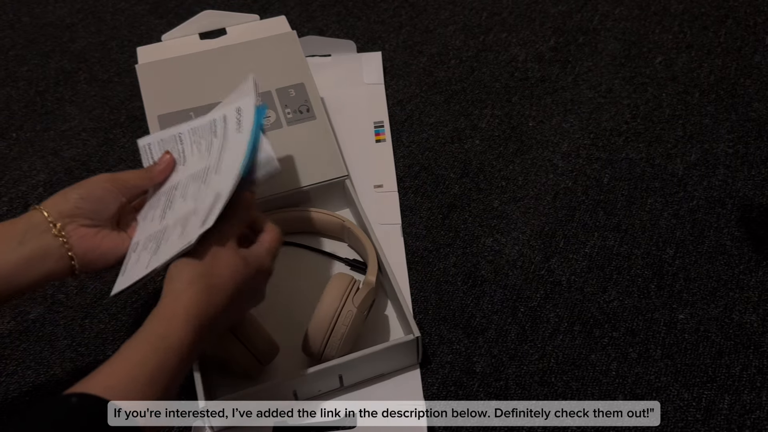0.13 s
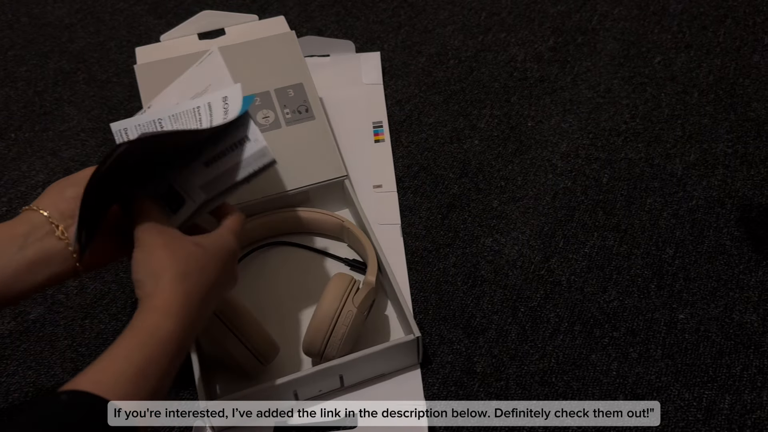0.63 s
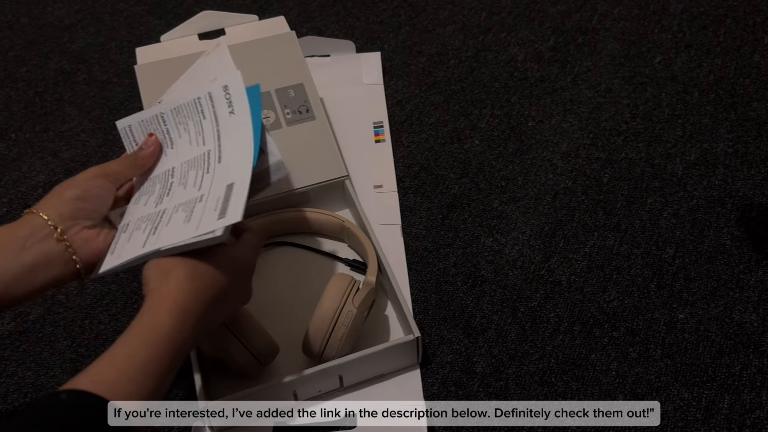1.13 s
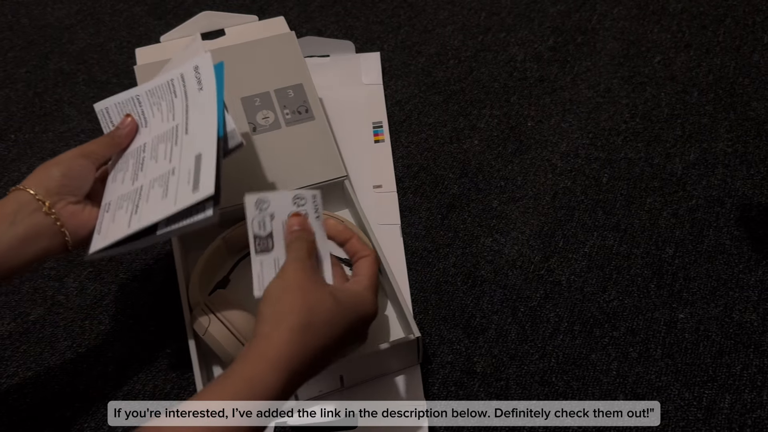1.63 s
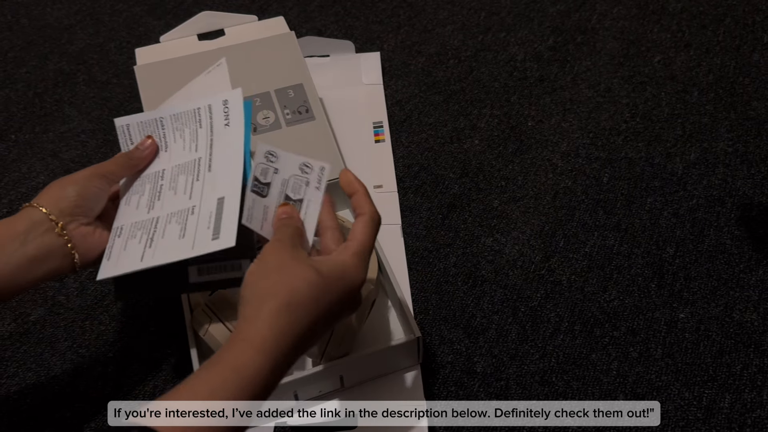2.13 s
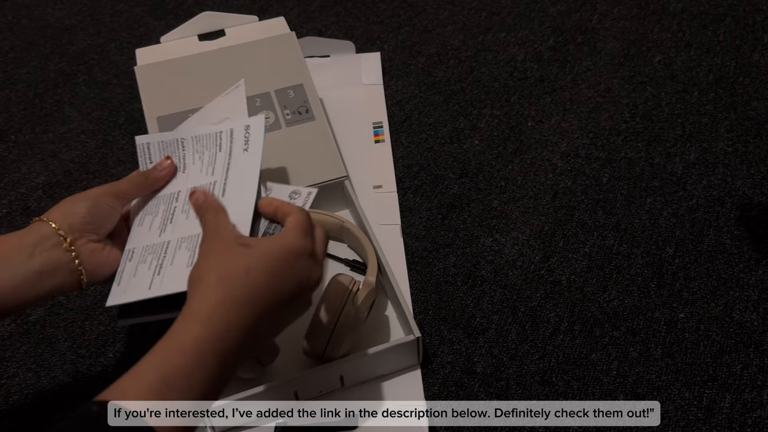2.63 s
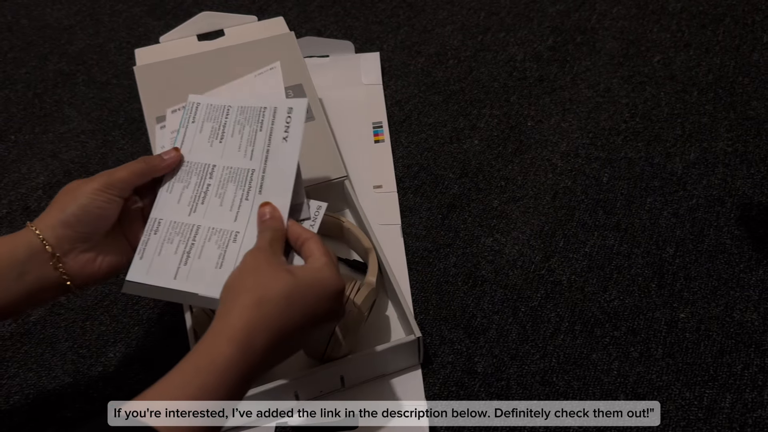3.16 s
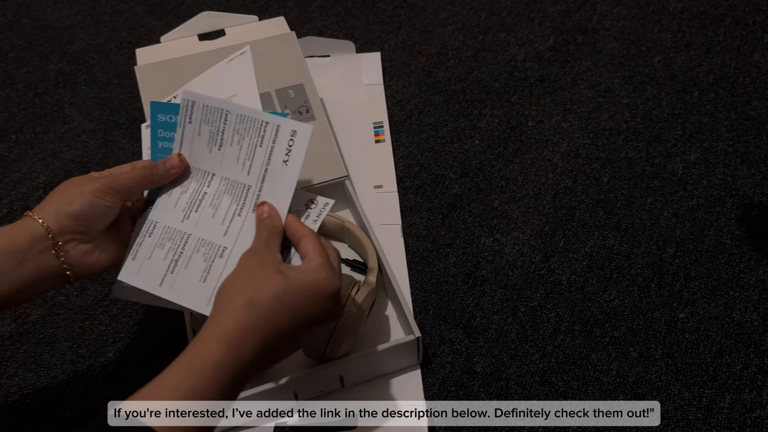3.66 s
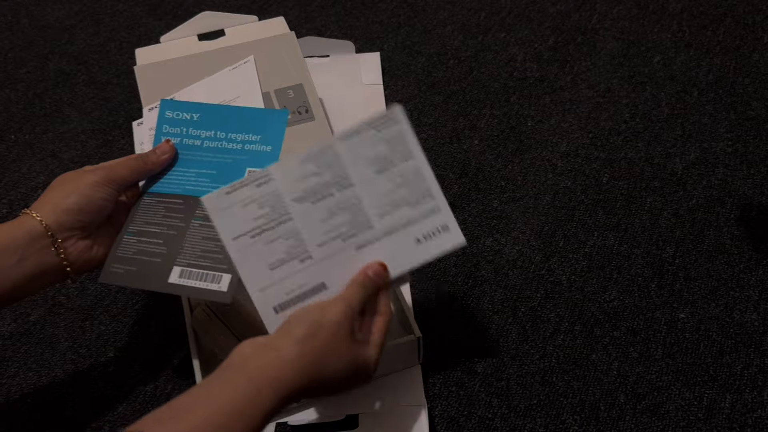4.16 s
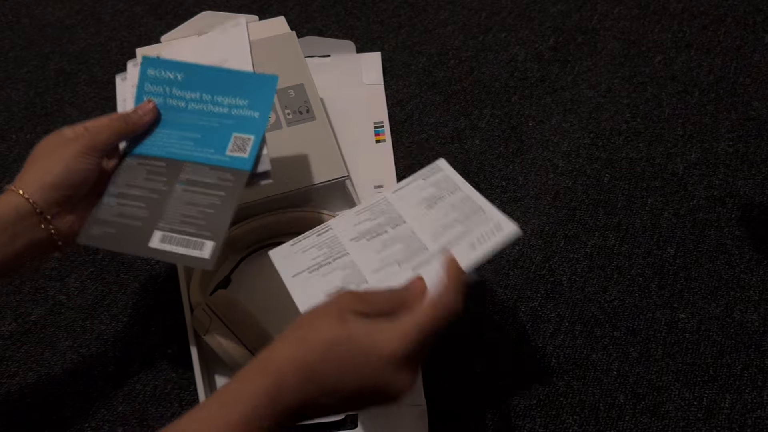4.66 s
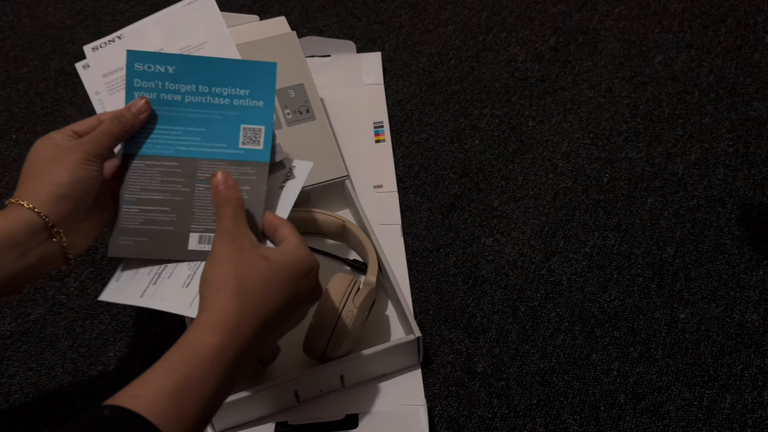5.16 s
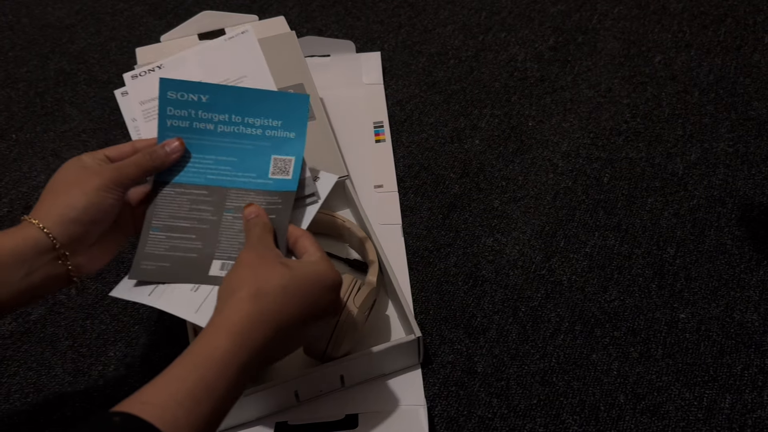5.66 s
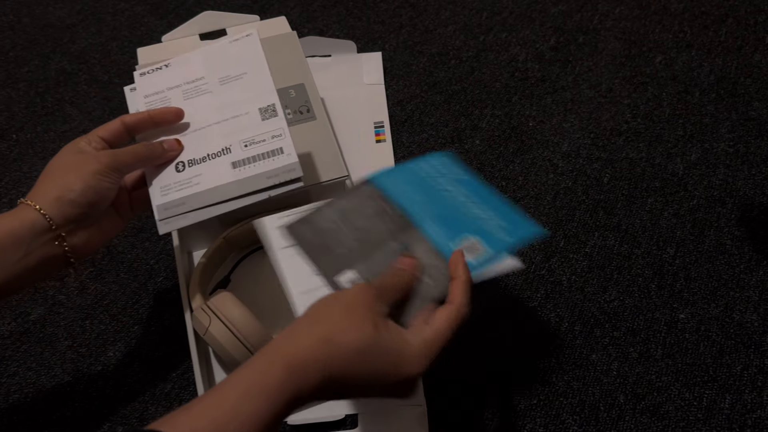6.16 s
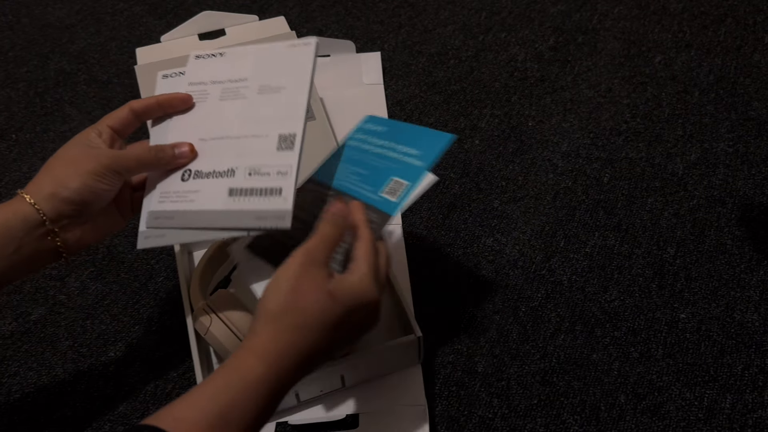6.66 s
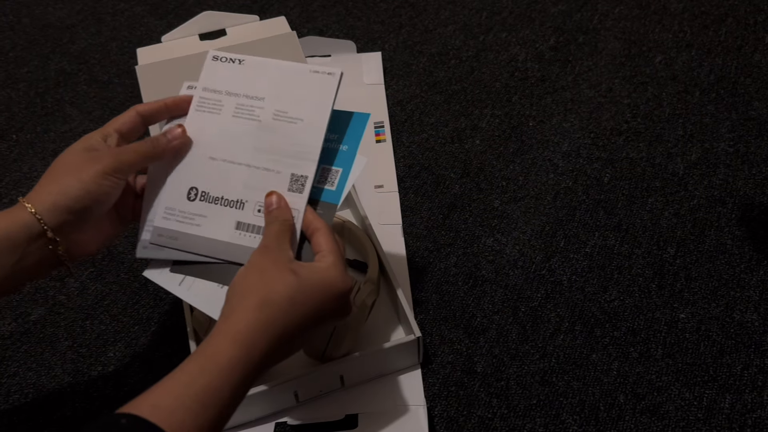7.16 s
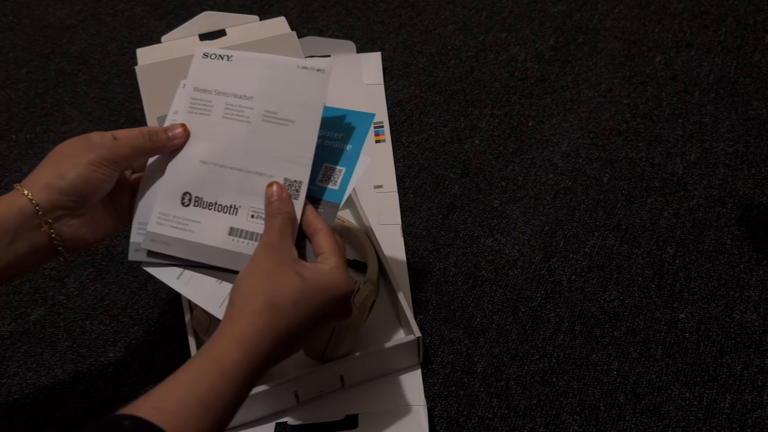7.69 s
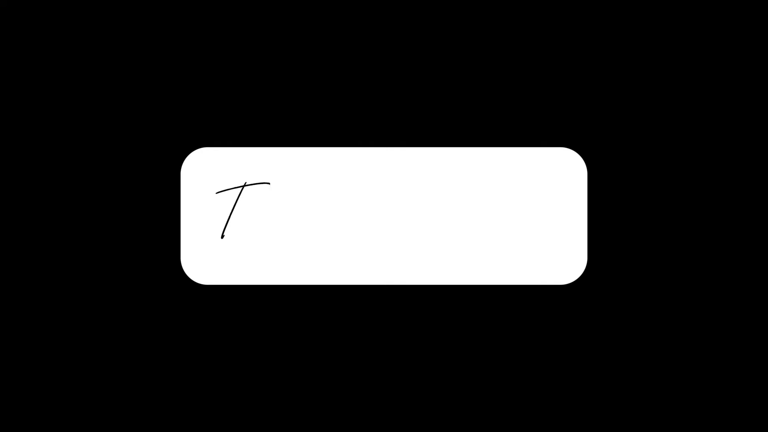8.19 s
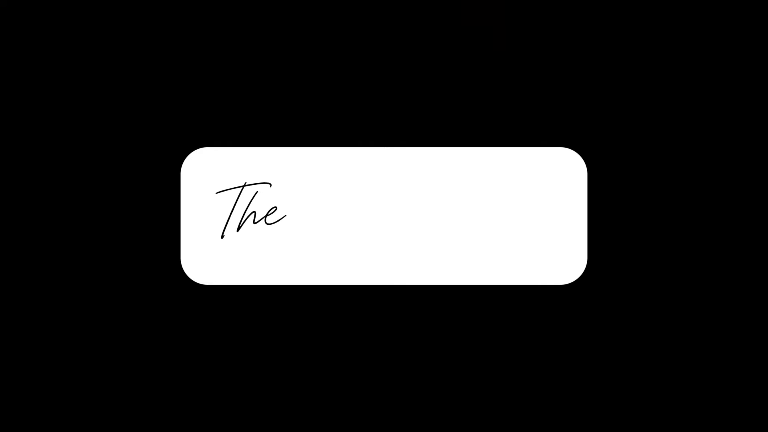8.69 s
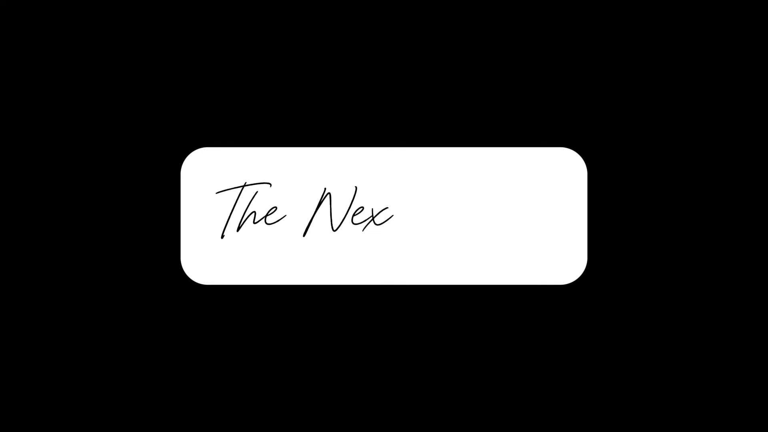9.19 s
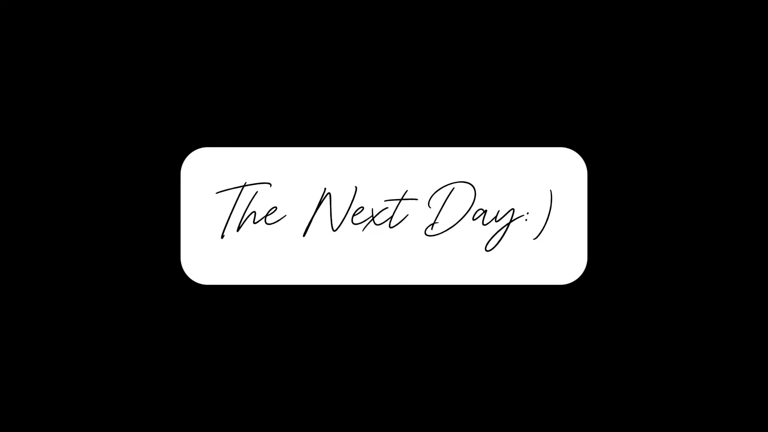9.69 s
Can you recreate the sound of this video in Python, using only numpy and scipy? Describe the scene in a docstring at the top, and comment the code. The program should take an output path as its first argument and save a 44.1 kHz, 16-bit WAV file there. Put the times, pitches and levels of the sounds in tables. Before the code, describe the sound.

Soft papery rustles, scrapes and small taps over a low appliance hum, abruptly replaced by close clacking plastic keys with low desk thumps.

```python
"""A quiet room with a humming appliance: hands leaf through paper leaflets over a cardboard box.
Skin and paper slide as shaped noise, edges scrape in clumped grains, taps ring panel and box resonances;
two close microphone ports hear them with a phase difference that depends on pitch.
After a hard cut, fingers type on a plastic keyboard: contact, rattle and thud ring its parts,
and the presses swing the desk under the microphone."""
import sys
import numpy as np
from scipy import signal
from scipy.fft import rfft, irfft, next_fast_len
from scipy.io import wavfile

SR = 44100
rng = np.random.default_rng(int(sys.argv[2]) if len(sys.argv) > 2 else 0)


def invert_db(x):
    """Field ratio 10**(x/20) for x, a level in decibels (scalar or array-like)."""
    u = np.asarray(x, float) / 20
    return 10 ** u


def inscribe(sig):
    """Save sig as 16-bit PCM at rate SR to the path in sys.argv[1].

    A 1-D sig is mono; a 2-D sig holds one channel per row.
    Samples are clipped to [-1, 1] before scaling.
    """
    pcm = np.round(np.clip(np.atleast_2d(sig).T, -1, 1) * 32767)
    wavfile.write(sys.argv[1], SR, pcm.astype(np.int16))


N = 433047
CUT_S = 8.062   # leaflets before, typing after

# decay of the room around the leaflets: (frequency [Hz], t60 [s])
PAPER_ROOM = [(300, 0.46), (2000, 0.37), (12000, 0.14)]
# decay of the room around the keyboard: (frequency [Hz], t60 [s])
KEY_ROOM = [(350, .25), (700, .22), (1400, .25), (2800, .2), (4000, .24), (12000, .15)]
# the two ports and the housing between them: (frequency [Hz], lag of the right port [degrees])
PORT_LAG = [(1500, 0), (2600, 60), (3600, 85), (4700, 5), (5700, -10), (6700, 65), (7900, 170), (9200, 180),
            (10900, 125), (12900, 28), (14500, 5)]

# mean levels of the appliance's motor lines: (frequency [Hz], level [dB rms])
MOTOR_LINES = [(84.9, -44.5), (169.7, -69), (254.6, -71.5), (364.8, -73)]
# colour of the room air: (frequency [Hz], relative level [dB per Hz])
AIR_COLOUR = [(20, -15), (38, -21), (91, -0.5), (116, -17), (367, -27), (1280, -41.5), (2500, -49),
              (7000, -65), (15500, -61)]

# colour of the rumble below the desk: (frequency [Hz], relative level [dB per Hz])
RUMBLE_COLOUR = [(15, -33), (25, -4), (152, -8.5), (189, -19.5), (266, -26), (300, -23), (2000, -48),
                 (3900, -50), (9000, -53), (11000, -110)]
# bending modes of the desk top, as settled: (frequency [Hz], t60 [s])
DESK_MODES = [(47.5, 0.88), (100, 0.28)]
# presses that shake the desk: (time [s], held [s], relative low mode [dB], relative upper mode [dB])
DESK_PRESSES = [(8.29, 0.11, -42.5, -64), (8.399, 0.099, -25.5, -23.5), (8.53, 0.099, -33.5, -34.5),
                (8.633, 0.21, -30, -25.5), (8.816, 0.096, -35.5, -26), (8.957, 0.1, -23.5, -25.5),
                (9.357, 0.14, -22.5, -30), (9.488, 0.08, -19, -19.5), (9.609, 0.18, -20, -18)]

# key strokes: (time [s], relative stroke [dB], then within the stroke:
# relative case ring [dB], relative cap tick [dB], relative thud [dB])
KEY_STROKES = [(8.234, -57.5, 8.5, -42.5, -31), (8.265, -33.5, -11.5, -46, -14),
               (8.286, -25, -15, -36, -28), (8.371, -40, -8.5, -15, -22), (8.39, -18.5, -39, -17, -20.5),
               (8.396, -18, -14, -29, -34), (8.487, -13.5, -13, -23, -50.5),
               (8.518, -10.5, -12.5, -21.5, -23.5), (8.617, -21.5, -22, -22, -39),
               (8.626, -12.5, -14.5, -14.5, -36.5), (8.73, -15, -14, -38.5, -53.5),
               (8.806, -12, -18, -19.5, -37.5), (8.895, -15.5, -11.5, -16, -42),
               (8.949, -15, -16.5, -15, -16.5), (8.961, -13.5, -20, -20, -30), (9.01, -34, -10, -29, -13.5),
               (9.061, -4, -18.5, -21, -29.5), (9.344, -30.5, -25, -5, -30.5),
               (9.351, -15, -17, -6.5, -37.5), (9.425, -28, -11, -36, -45), (9.441, -11.5, -10, -14, -32.5),
               (9.484, -12.5, -11.5, -21, -24), (9.57, -16.5, -11.5, -16, -50),
               (9.603, -7.5, -14, -13, -31.5), (9.674, -9.5, -10, -16.5, -39)]
# cap resonances, the lowest three for the knock, the rest for the tick:
# (centre frequency [Hz], width [Hz], relative level [dB])
CAP_MODES = [(2430, 500, -5), (2810, 550, -3.5), (3320, 610, -4.5), (4500, 1200, 2.5), (5800, 730, 2.5),
             (8000, 1900, -1), (13000, 720, -0.5)]
# case resonances: (centre frequency [Hz], width [Hz], relative level [dB])
CASE_MODES = [(686, 24, 2.5), (801, 140, 8.5), (1031, 22, 6.5), (1180, 190, 0), (1415, 45, -12)]
# tray resonances, heard as the thud: (centre frequency [Hz], width [Hz], relative level [dB])
TRAY_MODES = [(239, 42, -6), (296, 26, 2), (389.6, 37, 3), (480, 50, -6.5)]
# base plate, rings on after a stroke: (frequency [Hz], width [Hz], relative level [dB])
PLATE_MODES = [(975, 7, -2), (1045, 7, 1), (1110, 8, 1)]

# card and sheet edges scraping: (time [s], lasts [s], level before the fades [dB rms], panel resonance [Hz])
SCRAPES = [(0, 0.086, -63.5, 870), (0.491, 0.26, -58, 1320), (2.344, 0.099, -72, 670),
           (2.49, 0.36, -70.5, 660), (4.233, 0.2, -61, 1240), (4.343, 0.13, -54, 1180),
           (4.461, 0.048, -56.5, 1240), (4.634, 0.059, -58, 830), (4.831, 0.061, -54, 790),
           (5.737, 0.39, -66, 1040), (6.005, 0.21, -61, 770), (7.623, 0.12, -58, 1600),
           (7.903, 0.24, -62, 1390)]
# taps and snaps of sheets and card: (time [s], peak [dB], panel resonance [Hz])
TAPS = [(0.212, -47, 535), (0.324, -35.5, 347), (0.768, -46, 480), (1.327, -37, 1000), (1.352, -42, 900),
        (1.438, -14, 6750), (1.434, -33, 3500), (1.441, -23.5, 1810), (1.444, -37.5, 755),
        (1.701, -29.5, 1950), (2.356, -42, 422), (2.372, -45.5, 528), (2.391, -45.5, 646),
        (2.862, -36.5, 1500), (3.432, -42, 5700), (3.63, -39.5, 5000), (4.503, -35, 796), (4.583, -48, 990),
        (4.61, -38, 795), (4.855, -38.5, 1800), (4.942, -41, 690), (5.358, -42, 430), (6.034, -45, 650.6),
        (6.051, -42, 900), (6.075, -35, 740), (6.106, -39.5, 2100), (6.122, -35.5, 635),
        (6.242, -38.5, 1630), (6.312, -32.5, 1620), (6.387, -53, 595), (7.768, -31.5, 1840),
        (7.845, -32, 1530), (7.934, -34.5, 1960), (8.05, -40, 1085)]
# strokes of skin and paper over paper:
# (time of full speed [s], held [s], relative sheet hiss [dB], relative fingertip hiss [dB])
STROKES = [(0, 0.057, -65, -63), (0.238, 0.0067, -62, -66), (.36, 0.01, -64, -65.5), (.58, 0.31, -65, -65),
           (1.03, 0.1, -60, -57.5), (1.26, 0.02, -52, -50), (1.445, 0.052, -69, -71),
           (1.539, 0.032, -60.5, -55.5), (1.705, 0.014, -67.5, -58), (1.961, 0.19, -67.5, -65),
           (2.18, 0.095, -69.5, -64), (2.579, 0.031, -66.5, -62), (2.72, 0.1, -65.5, -65.5),
           (2.82, 0.052, -60.5, -60.5), (2.96, 0.47, -69, -74), (3.441, 0.15, -61, -60),
           (3.726, .32, -61, -62), (4.3, 0.22, -71, -62.5), (4.84, 0.014, -68, -67.5),
           (5.34, 0.017, -64.5, -70), (5.5, 0.069, -64.5, -70), (5.72, 0.046, -62.5, -64),
           (5.85, 0.18, -58, -58.5), (6.22, 0.16, -67, -70), (6.33, 0.14, -72.5, -74.5),
           (7.17, 0.06, -74, -69), (7.68, 0.0071, -62, -69), (8.04, 0.029, -55, -58)]
# colour of the sliding sheets: (frequency [Hz], relative level [dB per Hz])
SHEET_COLOUR = [(400, -4.5), (1400, -7), (3000, -0.5), (5500, -2.5), (7500, 1), (10000, 2.5), (14000, -34)]
# colour of the sliding fingertips: (frequency [Hz], relative level [dB per Hz])
FINGERTIP_COLOUR = [(5000, -56), (8000, 9), (11000, 4.5), (14000, -1), (16000, -10)]


def rms_one(x):
    """Scale to rms 1."""
    return x / np.sqrt(np.mean(x ** 2) + 1e-20)


def at_hz(points, hz):
    """Read a table on a log-frequency axis."""
    table_hz, values = np.array(points).T
    return np.interp(np.log(hz + 1), np.log(table_hz), values)


def coloured(x, spectrum):
    """Shape steady noise by a spectrum; rms 1."""
    size = next_fast_len(N)
    gain = invert_db(at_hz(spectrum, np.fft.rfftfreq(size, 1 / SR)))
    return rms_one(irfft(rfft(x, size) * gain, size)[..., :N])


def drift(rate):
    """Slow chance: straight lines between random knots of spread 1, rate knots per second."""
    knots = rng.standard_normal(int(N / SR * rate) + 2)
    return np.interp(np.arange(N) / SR * rate, np.arange(len(knots)), knots)


def resonance(x, hz, width_hz):
    """Two-pole resonance with gain about 1 on top."""
    r = np.exp(-np.pi * width_hz / SR)
    poles = [1, -2 * r * np.cos(2 * np.pi * hz / SR), r * r]
    return signal.lfilter([(1 - r * r) / 2, 0, (r * r - 1) / 2], poles, x)


def grains(shape, spread_db):
    """Dense clicks of random sign, a few much larger than the rest."""
    return rng.standard_normal(shape) * invert_db(spread_db * np.minimum(rng.exponential(1, shape), 4))


def add(track, s, sound):
    """Lay a sound into a track at time s."""
    i = round(s * SR)
    track[i:i + len(sound)] += sound[:N - i]


def room(x, t60_table, gap_s):
    """Mid and side tails: octave bands of noise dying at their own rate; energy of the mid tail 1."""
    t, tails = np.arange(SR // 2) / SR, 0
    for hz in 177 * 2. ** np.arange(7):
        octave = signal.butter(2, [hz / np.sqrt(2), hz * np.sqrt(2)], "band", fs=SR, output="sos")
        noise = signal.sosfilt(octave, rng.standard_normal((2, len(t))))
        tails = tails + noise * invert_db(-60 * t / at_hz(t60_table, hz))
    tails = tails * np.clip(t / gap_s, 0, 1)
    tails = tails / np.sqrt(np.sum(tails[0] ** 2))
    return signal.fftconvolve(x[None], tails, axes=1)[:, :N]


def two_ports(x):
    """Both ports hear the same sound, turned against each other by an angle that depends on pitch."""
    size = next_fast_len(N)
    half_lag = np.radians(at_hz(PORT_LAG, np.fft.rfftfreq(size, 1 / SR))) / 2
    turn = np.exp(1j * half_lag)
    return irfft(rfft(x, size) * np.array([turn, turn.conj()]), size)[:, :N]


def appliance():
    """Motor lines that waver a little, a noisy resonant whine and room air, as mid and side."""
    whine_hz, whine_width_hz, whine_db = 1960, 290, -77.5   # width of each of two resonances in a row
    air_db = -59
    cycles_per_hz = np.cumsum(1 + 0.0019 * drift(3.09)) / SR   # all lines waver together
    lines = np.zeros(N)
    for hz, db in MOTOR_LINES:
        level = invert_db(db + 0.43 * drift(4.4) + 0.5 * drift(37))
        lines += level * np.sqrt(2) * np.sin(2 * np.pi * hz * cycles_per_hz)
    whine = rng.standard_normal((2, N))
    for _ in range(2):
        whine = resonance(whine, whine_hz, whine_width_hz)
    air = invert_db(air_db) * coloured(rng.standard_normal((2, N)), AIR_COLOUR)
    return lines * [[1], [0]] + invert_db(whine_db) * rms_one(whine) + air   # lines in the mid only


def desk():
    """Each press swings two bending modes of the desk top until the lift damps them; faint rumble below."""
    sag, sag_s = 0.12, 0.036   # pitch starts this share high and settles with this time constant
    rumble_db, rumble_falls_by_s = -58, 9.2   # level before the fall to 0.22
    out, t = np.zeros(N), np.arange(SR // 2) / SR
    settling = t + sag * sag_s * (1 - np.exp(-t / sag_s))
    for s, held, *levels in DESK_PRESSES:
        swell = 1 - np.exp(-(t / 0.015) ** 2)
        lift = np.exp(-np.maximum(t - held, 0) / 0.046)
        for (hz, t60), db in zip(DESK_MODES, levels):
            swing = np.sin(2 * np.pi * hz * settling)
            add(out, s, invert_db(db + 1.5 - 60 * t / t60) * swell * lift * swing)
    fading = np.clip((rumble_falls_by_s - np.arange(N) / SR) / 0.068, 0.22, 1)
    return out + invert_db(rumble_db) * fading * coloured(rng.standard_normal(N), RUMBLE_COLOUR)


def struck(force, modes, chance, spread_db, detune):
    """Every blow lands elsewhere: new strengths and slightly other pitches; peak 1."""
    ring = 0
    for (hz, width, db), (a, b) in zip(modes, chance):
        ring = ring + invert_db(db + spread_db * a) * resonance(force, hz * (1 + detune * b), width)
    return ring / np.max(np.abs(ring))


def keys():
    """The stem rubs, hits its stop, then rattles; the cap ticks at once, case and tray answer later."""
    rattle_s, usual_thud_db = 0.0049, -31.5   # rattle of a key at this thud
    rattle_follows = 0.43   # dB of rattle time per dB of thud: heavier thuds rattle longer
    clatter_db, clatter_s = -42.5, 0.085   # loose neighbouring caps shiver on after a stroke
    contact = 0.6   # first contact against the rattle that follows
    top_hz, dulls = 15360, 0.18   # top of a 0 dB stroke; softer ones are duller (dB of pitch per dB)
    out, lead_s = np.zeros((6, N)), 0.02
    t = np.arange(8000) / SR - lead_s
    after = np.maximum(t, 0)
    noises = grains((len(KEY_STROKES), len(t)), spread_db=6.5)
    chances = rng.standard_normal((len(KEY_STROKES), 18, 2))
    for k, (stroke, noise, chance) in enumerate(zip(KEY_STROKES, noises, chances)):
        s, db, case_db, tick_db, thud_db = stroke
        rattle = rattle_s * invert_db(rattle_follows * (thud_db - usual_thud_db))
        rub = invert_db(-20.5) * np.exp(np.minimum(t, 0) / 0.0041) * (t < 0)
        shake = np.exp(-(after / rattle) ** 1.8) + invert_db(clatter_db) * np.exp(-after / clatter_s)
        burst = noise * (rub + shake * np.clip(t / 0.0015, 0, 1))
        burst[round((lead_s + 0.001) * SR)] += contact * np.sqrt(np.sum(burst ** 2))
        push = noise * after * np.exp(-after / 0.0042)
        slump = noise * after * np.exp(-after / 0.011)
        knock = struck(burst, CAP_MODES[:3], chance, spread_db=5.0, detune=0.11)
        tick = struck(burst, CAP_MODES[3:], chance[4:], spread_db=3.0, detune=0.077)
        case = struck(push, CASE_MODES, chance[9:], spread_db=1.5, detune=0.047)
        thud = struck(slump, TRAY_MODES, chance[14:], spread_db=2.5, detune=0.065)
        sound = knock + 0.5 * burst / np.max(np.abs(burst))
        sound += invert_db(tick_db + 11.0) * tick + invert_db(case_db + 8.0) * case + invert_db(thud_db + 8.0) * thud
        softness = signal.butter(4, top_hz * invert_db(dulls * db), fs=SR, output="sos")
        sound = signal.sosfilt(softness, sound)
        add(out[k % len(out)], s - lead_s - 0.001, invert_db(db - 3.0) * sound)   # six tracks take turns
    return out


def base_plate(strokes):
    """Narrow resonances driven by the squared stroke, so that hard strokes ring the plate most."""
    bottoming = strokes * np.abs(strokes) / np.max(np.abs(strokes))
    return sum(invert_db(db) * resonance(bottoming, hz, width) / np.sqrt(width / 100)
               for hz, width, db in PLATE_MODES)


def scrapes():
    """Edges stick and slip in clumped grains; the panel answers with a main and a higher resonance."""
    out, stutter = np.zeros(N), grains(N, spread_db=4.0) * invert_db(4.0 * drift(90))
    for s, lasts, db, hz in SCRAPES:
        slips = stutter[round(s * SR):round((s + lasts) * SR)]
        sound = resonance(slips, hz, 0.62 * hz) + 0.34 * resonance(slips, 2.1 * hz, 0.43 * hz)
        add(out, s, invert_db(db) * rms_one(sound) * np.sqrt(np.hanning(len(slips))))
    return out


def taps():
    """A sharp contact and a short burst of grains ring the panel, a broad snap an octave up and the box."""
    t60_at_1khz_s, shortens = 0.045, 0.16   # power of pitch by which higher panels die sooner
    contact, snap_share = 0.65, 0.25   # first contact against the burst; bright part of a tap
    box_hz, box_width_hz, box_share = 457, 700, 0.94   # the hollow box answers dull taps most
    out, t = np.zeros(N), np.arange(6000) / SR
    for (s, db, hz), noise in zip(TAPS, grains((len(TAPS), len(t)), spread_db=0.4)):
        t60 = t60_at_1khz_s * (1000 / hz) ** shortens
        burst = noise * invert_db(-60 * t / t60) * np.clip(t / 0.0019, 0, 1)
        burst[round(0.002 * SR)] += contact * np.sqrt(np.sum(burst ** 2))
        sound = resonance(burst, hz, 0.37 * hz) + snap_share * resonance(burst, 2 * hz, 2 * hz)
        sound += box_share * np.sqrt(1000 / hz) * resonance(burst, box_hz, box_width_hz)
        softness = signal.butter(2, min(4 * hz, 16000), fs=SR, output="sos")   # dull panels are hit softly
        sound = signal.sosfilt(softness, sound)
        add(out, s - 0.002, invert_db(db) * sound / np.max(np.abs(sound)))
    return out


def stroke_level(column):
    """Each stroke speeds up, slackens while held and lifts off; relative level in dB of one hiss."""
    speed_up, slacken, lift = 161, 4.5, 206   # relative dB per s
    resting_db = -80   # relative; hands that only hold the sheets
    power, t = invert_db(2 * resting_db), np.arange(0, N + 64, 64) / SR
    for s, held, *levels in STROKES:
        since = t - s
        loss = speed_up * np.maximum(-since, 0)
        loss += slacken * np.clip(since, 0, held)
        loss += lift * np.maximum(since - held, 0)
        power = power + invert_db(2 * (levels[column] - loss))
    return np.interp(np.arange(N) / SR, t, 10 * np.log10(power))


def sliding():
    """Paper and skin hiss as coloured noise under a shared uneven grip; creases tick now and then."""
    grip = drift(40)
    creases = invert_db(11) * (rng.random(N) < 40 / SR) * grains(N, spread_db=3.5)   # about 40 per second
    sheet_db = 0.89 * stroke_level(0) - 4.0 + 3.64 * grip + 1.0 * drift(9.3)
    sheet = coloured(grains(N, spread_db=3.0) + creases, SHEET_COLOUR) * invert_db(sheet_db)
    skin_db = 1.12 * stroke_level(1) + 12.5 + 3.6 * grip + 1.5 * drift(7)
    fingertip = coloured(rng.standard_normal(N), FINGERTIP_COLOUR) * invert_db(skin_db)
    return sheet + fingertip


def leaflets():
    """Paper close to the two ports, with the room and the appliance around it."""
    paper = sliding() + scrapes() + taps()
    mid, side = invert_db(-10.0) * room(paper, PAPER_ROOM, gap_s=0.00024) + appliance()
    ports_differ = signal.butter(1, [400, 11000], "band", fs=SR, output="sos")   # they agree in bass and top
    side = signal.sosfilt(ports_differ, side)
    return two_ports(paper + mid) + 1.04 * side * np.array([[1], [-1]])


def typing():
    """Key strokes and plate with echoes of the strokes, and the desk under the microphone."""
    tracks = keys()
    strokes = sum(tracks)
    echoes = sum(room(track, KEY_ROOM, gap_s=0.0037) for track in tracks)   # each track has its own
    mid, side = invert_db(-15.5) * echoes
    return strokes + base_plate(strokes) + mid + 0.06 * side * np.array([[1], [-1]]) + desk()


def scene():
    """Leaflets up to the cut, typing after it."""
    after = np.clip((np.arange(N) / SR - CUT_S) / 0.001, 0, 1)
    return leaflets() * (1 - after) + typing() * after


def roll_off(x):
    """The treble ends steeply here."""
    return signal.sosfilt(signal.butter(12, 16470, fs=SR, output="sos"), x)


def record(dry):
    """The microphone's sound loses its top: 50 dB down from 16.5 kHz upward."""
    top_cut = signal.cheby2(12, 50, 16500, fs=SR, output="sos")
    mix = signal.sosfilt(top_cut, dry)
    return roll_off(mix)


dry = scene()
out = record(dry)
inscribe(out)
```